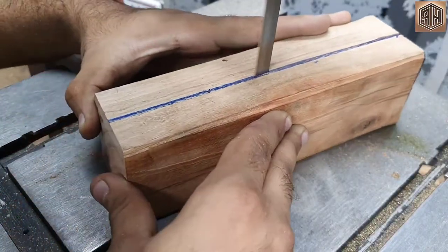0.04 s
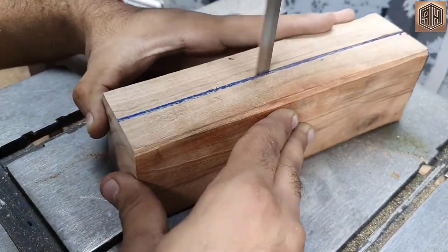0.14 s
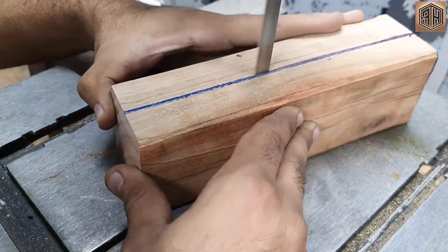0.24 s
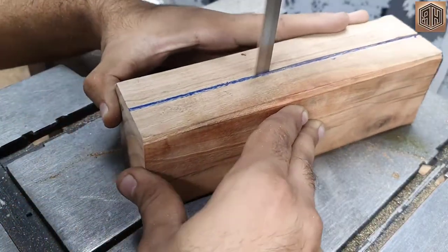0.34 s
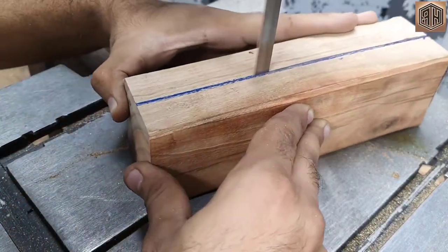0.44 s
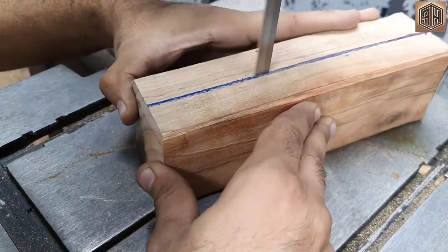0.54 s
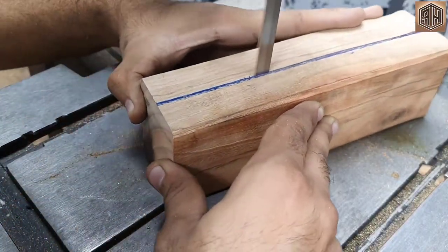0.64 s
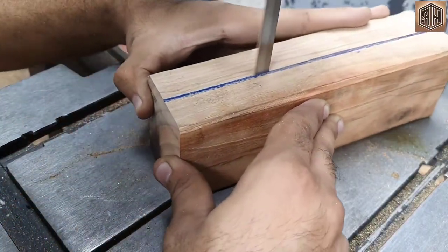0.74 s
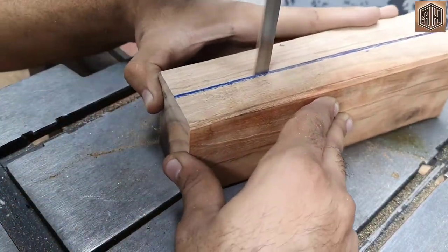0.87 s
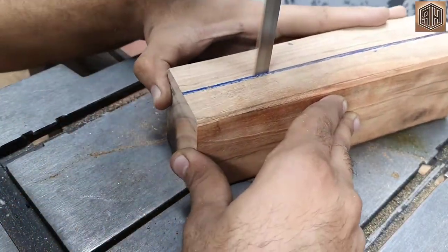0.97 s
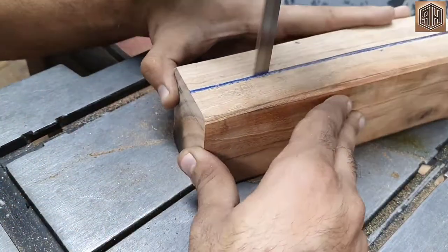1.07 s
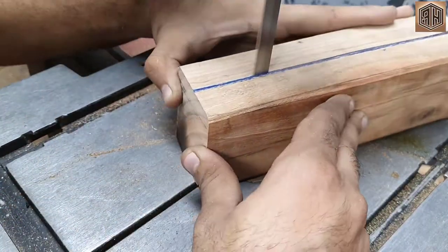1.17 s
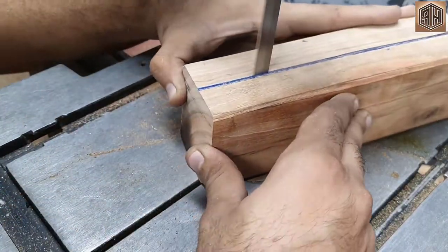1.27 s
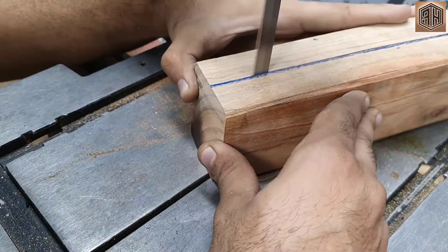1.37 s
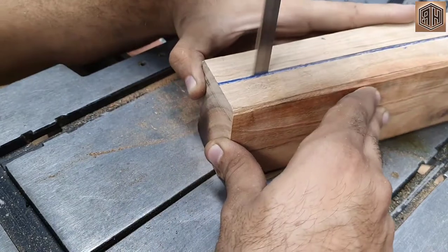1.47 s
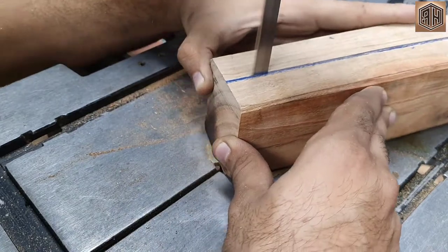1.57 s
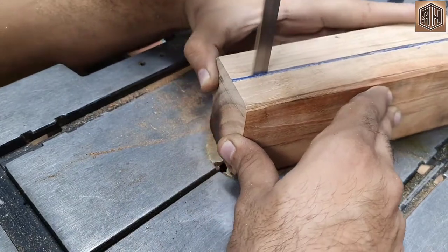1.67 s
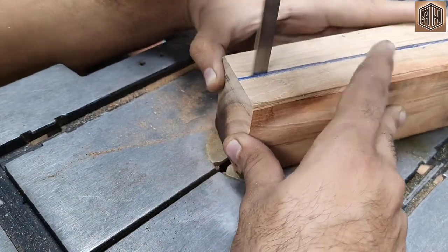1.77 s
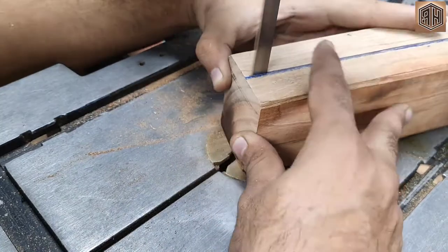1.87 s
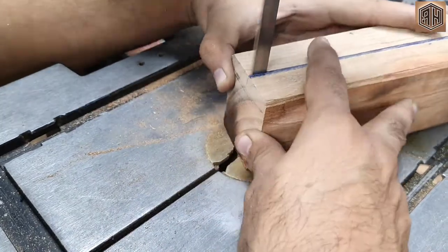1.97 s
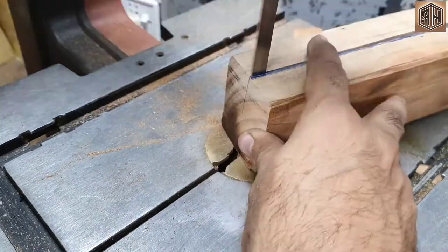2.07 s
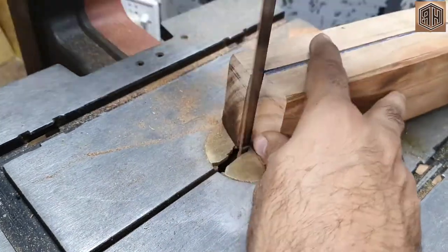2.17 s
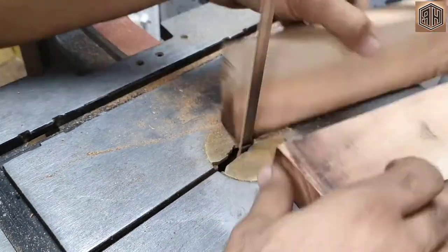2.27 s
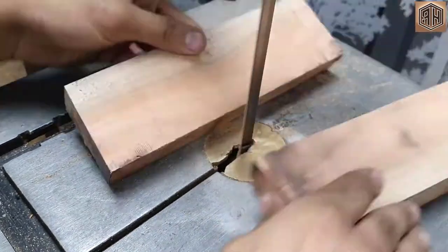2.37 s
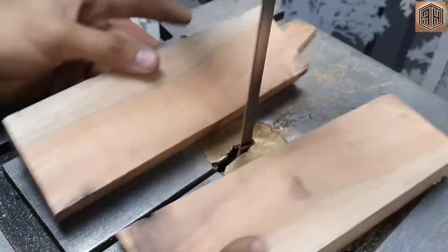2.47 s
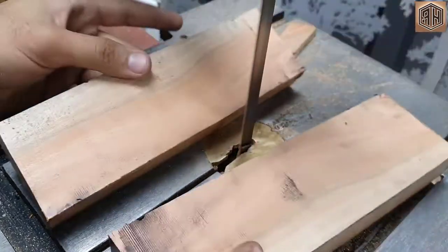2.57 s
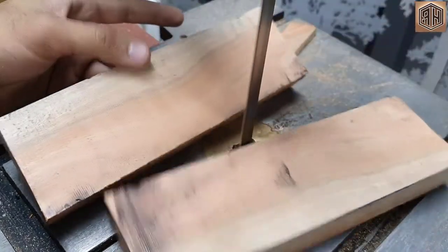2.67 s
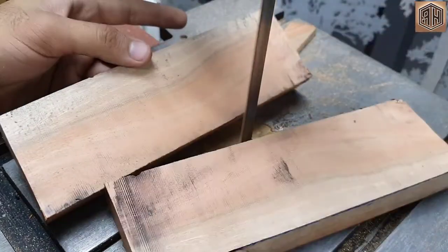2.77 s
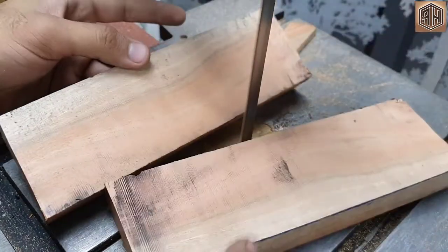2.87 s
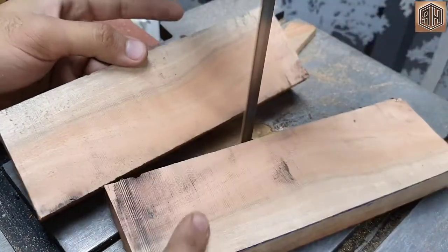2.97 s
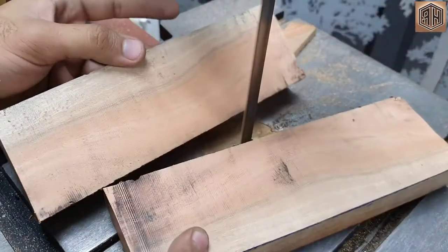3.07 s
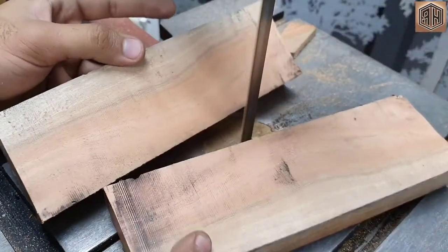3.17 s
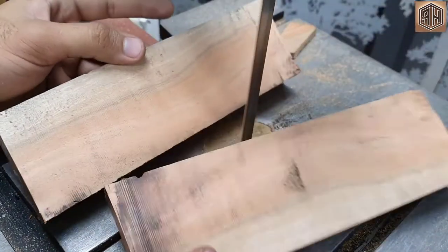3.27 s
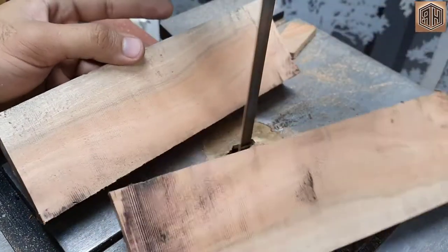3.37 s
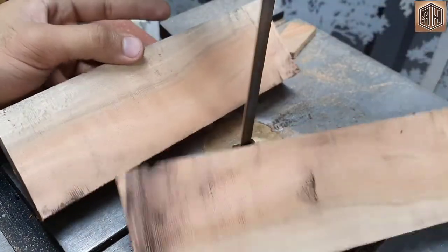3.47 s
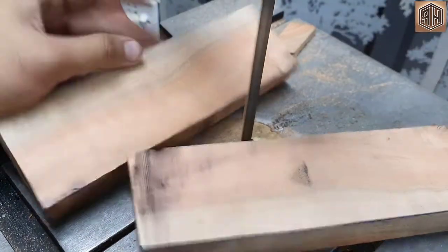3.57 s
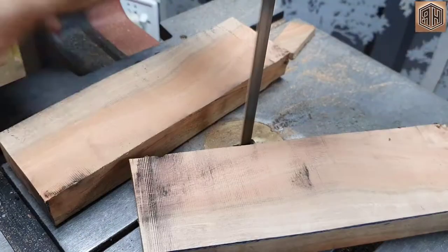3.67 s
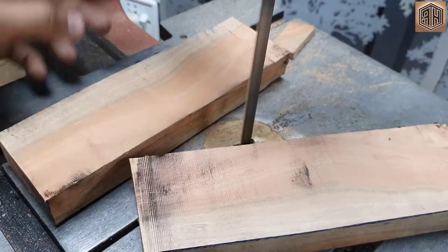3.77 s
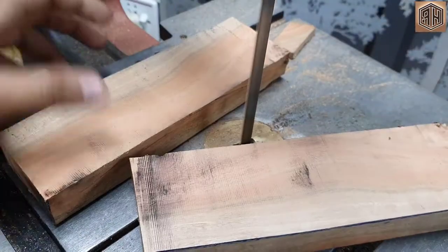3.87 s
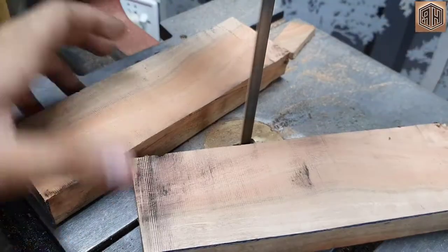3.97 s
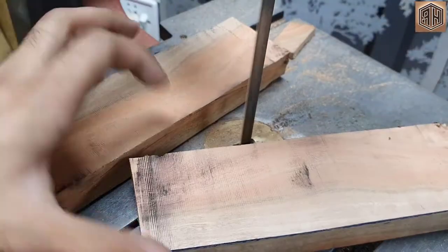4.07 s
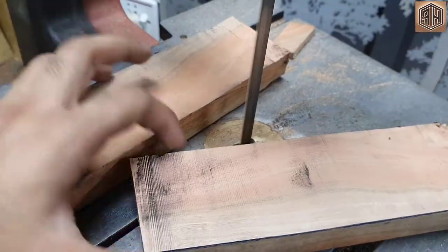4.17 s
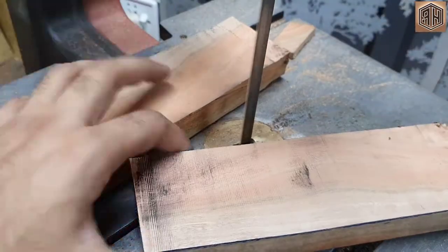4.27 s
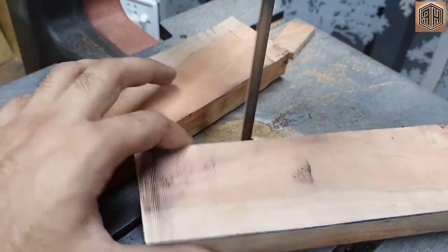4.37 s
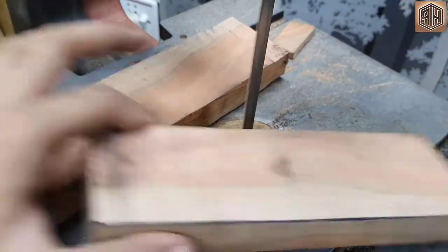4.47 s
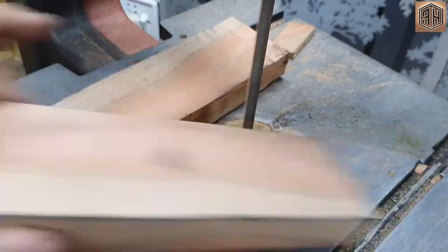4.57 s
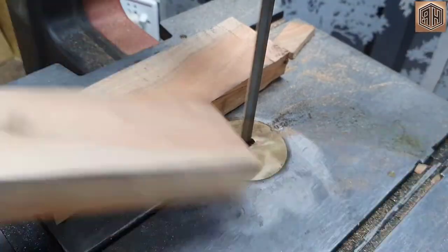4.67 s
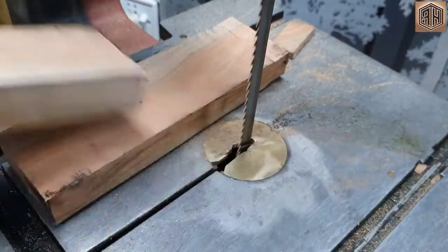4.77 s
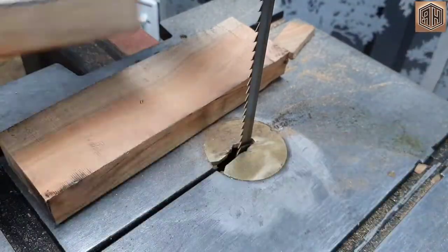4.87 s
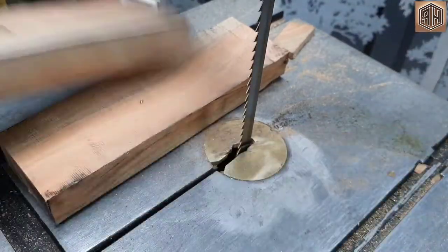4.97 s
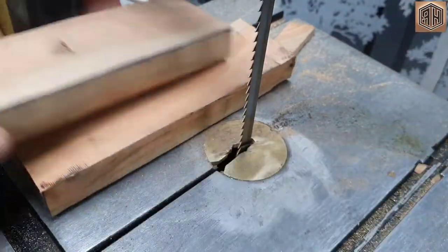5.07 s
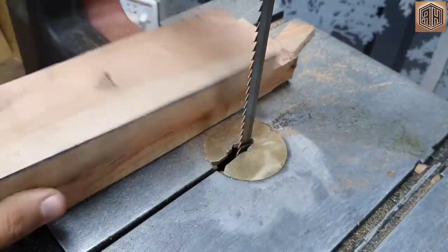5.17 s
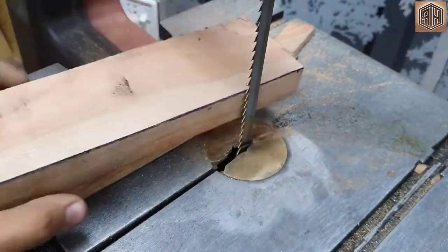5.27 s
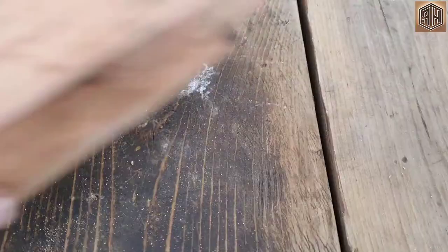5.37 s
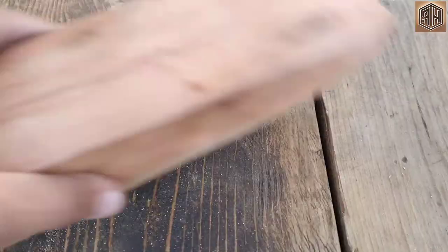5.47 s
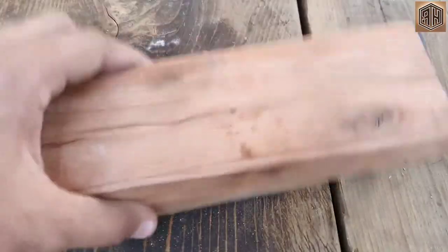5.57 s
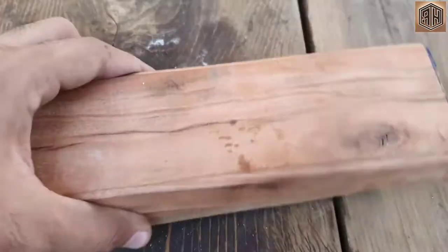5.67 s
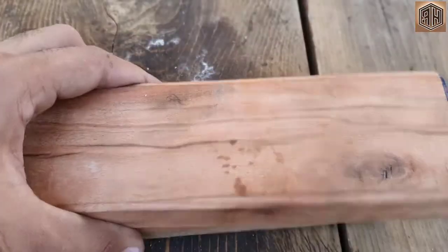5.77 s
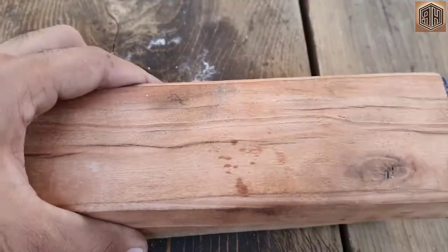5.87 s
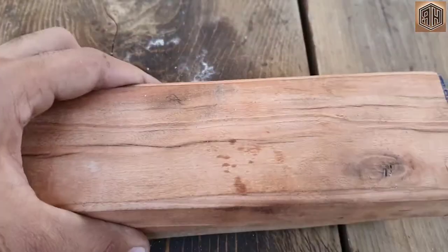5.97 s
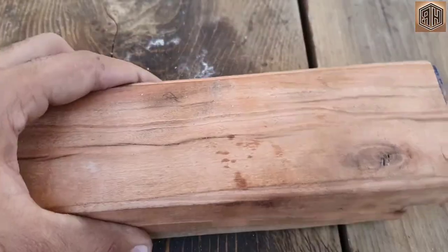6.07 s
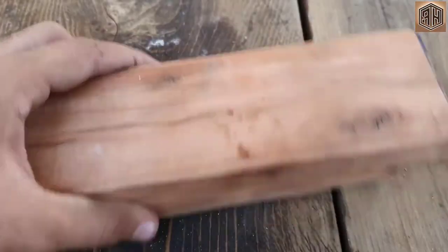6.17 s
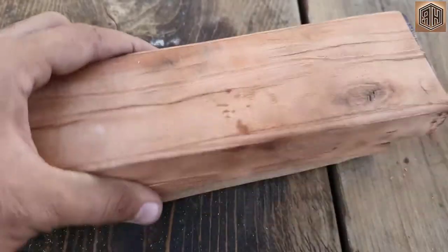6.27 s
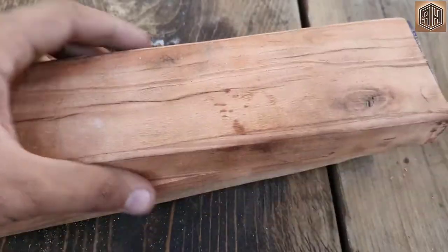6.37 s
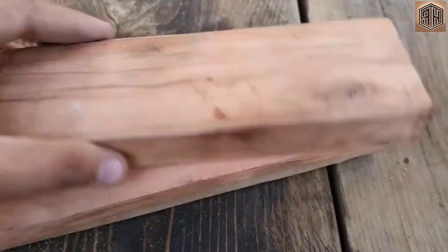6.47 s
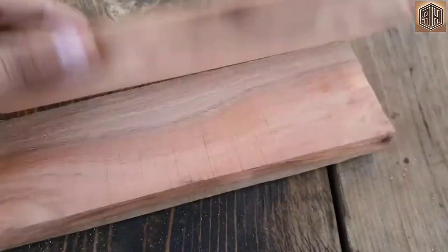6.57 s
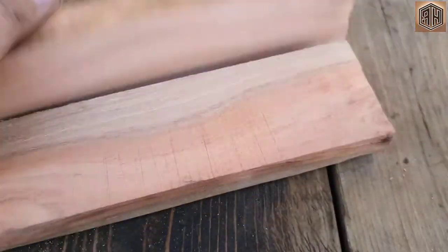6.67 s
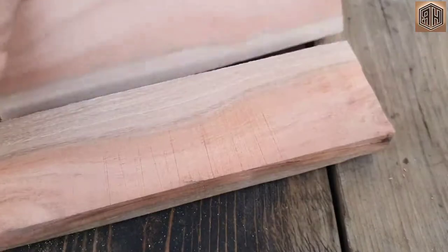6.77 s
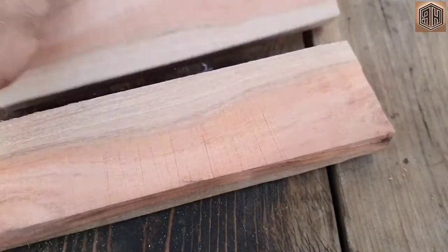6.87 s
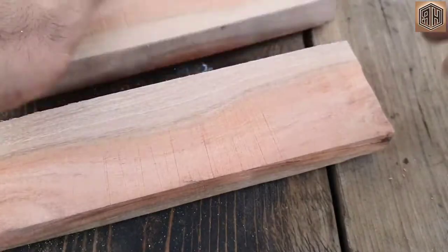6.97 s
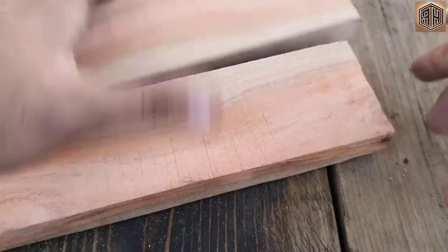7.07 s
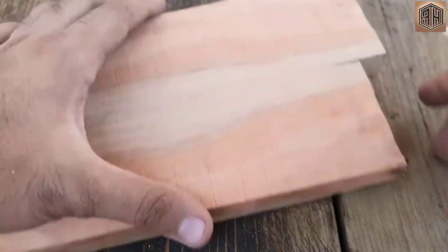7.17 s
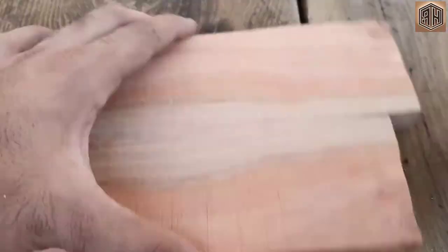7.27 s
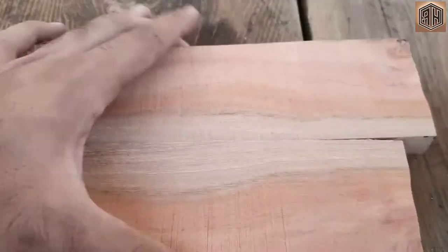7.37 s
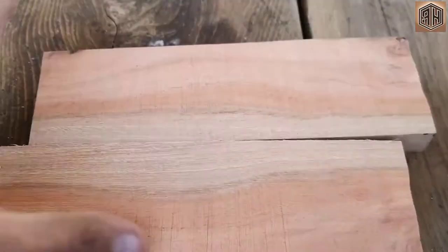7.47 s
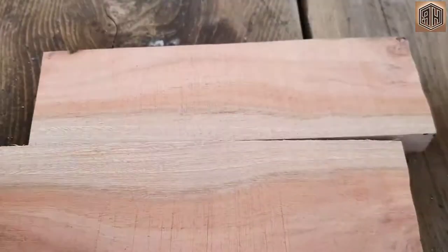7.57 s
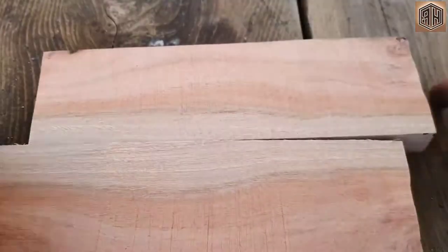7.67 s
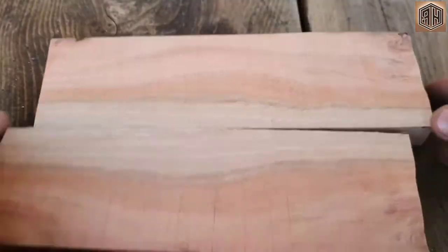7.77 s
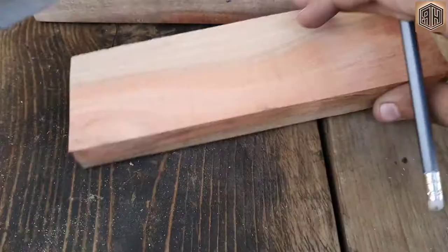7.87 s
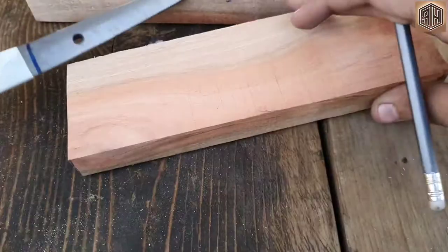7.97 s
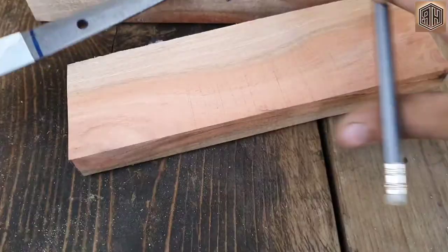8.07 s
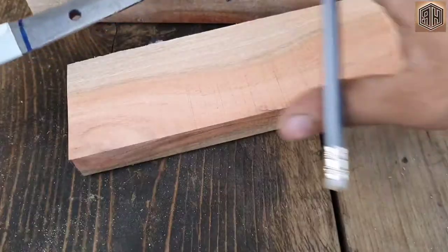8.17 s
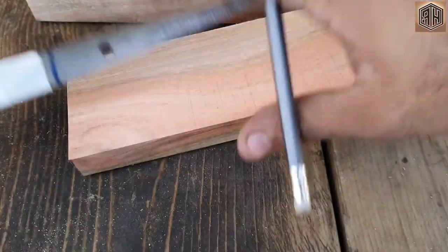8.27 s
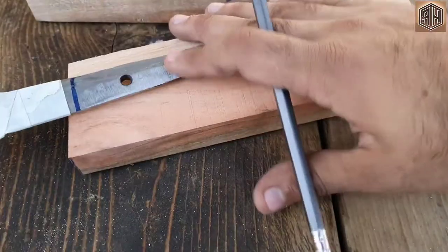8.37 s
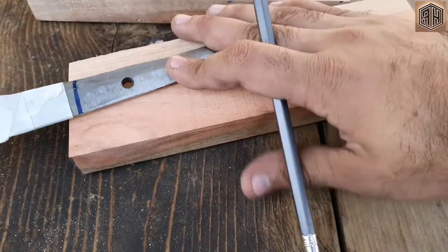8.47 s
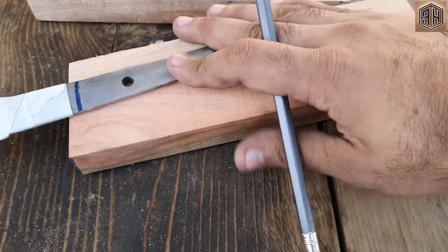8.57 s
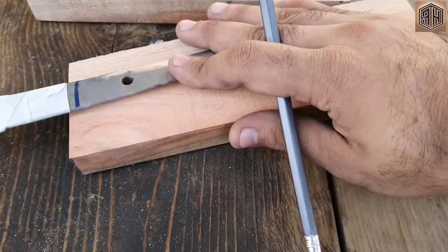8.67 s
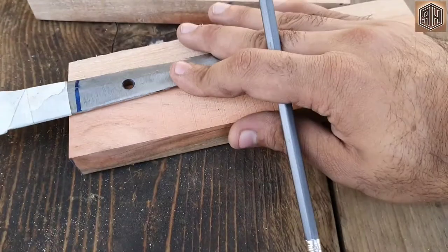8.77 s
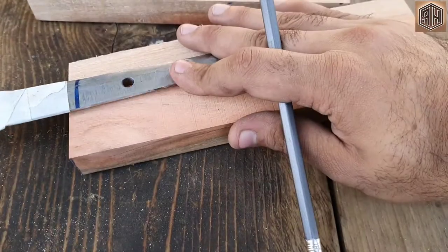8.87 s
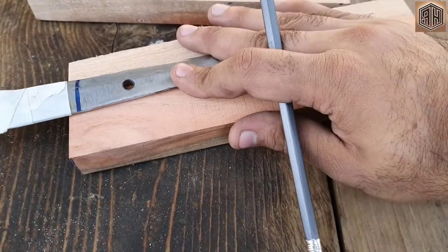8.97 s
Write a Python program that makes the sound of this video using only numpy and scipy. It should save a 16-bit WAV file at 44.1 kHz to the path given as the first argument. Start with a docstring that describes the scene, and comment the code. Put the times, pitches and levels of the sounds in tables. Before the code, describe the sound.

A bandsaw rasps loudly through a wooden block, squeals and snaps free, coasts down rumbling, then wood knocks on steel and bench and metal clinks.

```python
"""A bandsaw rasps through a wooden block: tooth-shaped noise bursts ring the blade over a droning frame.
The blade squeals, breaks through with a snap of fibres, then rumbles and rubs as it coasts to rest.
The two halves knock on the steel saw table, then on a plank bench: short impacts, clatter and ringing modes.
They slide about as grainy noise, a steel rule clinks down on one of them, and a small workshop answers."""
import sys
import numpy as np
from scipy import signal
from scipy.fft import rfft, irfft, next_fast_len
from scipy.io import wavfile
from scipy.ndimage import uniform_filter1d

SR = 44100
rng = np.random.default_rng(int(sys.argv[2]) if len(sys.argv) > 2 else 0)


def int16_out(signal):
    """Quantize to a 16-bit WAV file."""
    q = np.round(np.clip(np.atleast_2d(signal).T, -1, 1) * 32767)
    wavfile.write(sys.argv[1], SR, q.astype(np.int16))


N = 398223

# fine hiss of the cut as the block is fed: level_db, drift_db_per_s, drop_at_s, drop_db
HISS_LAW = (-28.1, 1.6, 2.31, 17)
# stereo width of the cut: frequency_hz, side_minus_mid_db
CUT_WIDTH = [(100, -15), (400, -38.5), (2400, -22.5), (4400, -2.5), (15000, -2.5)]
# stereo width of everything else that is spread: frequency_hz, side_minus_mid_db
WIDTH = [(100, -21), (500, -7), (8000, 2.5)]
# the sound drops out for an instant: start_s, end_s
DROPOUT_S = (5.398, 5.421)
CUT_END_S = 2.482
EDGE_RISE_S = .0008  # onset of ringing wood and hard edges


def amp(db):
    """Decibels to gain."""
    return np.exp(np.log(10) / 20 * np.asarray(db))


def unit(x):
    """x at rms 1."""
    return x / np.sqrt(np.mean(x ** 2) + 1e-20)


def along(points, hz):
    """Read (frequency_hz, value) points on a log frequency axis."""
    f, v = np.transpose(points)
    return np.interp(np.log(hz + 1), np.log(f + 1), v)


def curves(rows):
    """One value per sample for each column after the time."""
    s, *cols = np.transpose(rows)
    return [np.interp(np.arange(N) / SR, s, c) for c in cols]


def wobble(rate, size=N):
    """A smooth random curve, rate knots a second."""
    knots = signal.resample_poly(rng.standard_normal(int(size * rate / SR) + 4), up=4, down=1)
    return np.interp(np.arange(size) * 4 * rate / SR, np.arange(len(knots)), knots)


def phase(hz):
    """Running phase of a changing frequency."""
    return 2 * np.pi * np.cumsum(hz) / SR


def between(start, end):
    """1 from start to end, with short fades."""
    t = np.arange(N) / SR
    return uniform_filter1d(1. * ((t >= start) & (t <= end)), size=400)


def swells(rows):
    """Gain of (centre_s, half_length_s, level_db) strokes that each rise and fall smoothly."""
    t = np.arange(N) / SR
    power = 0
    for s, half, db in rows:
        stroke = np.exp(-np.minimum(((t - s) / half) ** 2, 20))
        power = power + (amp(db) * stroke) ** 2
    return np.sqrt(power)


def noise():
    """Two unrelated white noises: mid and side."""
    return rng.standard_normal((2, N))


def filtered(x, response):
    """x times a response of frequency."""
    n = x.shape[-1]
    m = next_fast_len(n + 8192, True)
    return irfft(rfft(x, m) * response(np.fft.rfftfreq(m, 1 / SR)), m)[..., :n]


def coloured(x, spectrum):
    """x shaped by a (frequency_hz, db_per_hz) spectrum, at rms 1."""
    return unit(filtered(x, lambda hz: amp(along(spectrum, hz))))


def resonance(x, hz, width_hz):
    """x through one resonance."""
    return signal.lfilter(*signal.iirpeak(hz, hz / width_hz, fs=SR), x)


def resonate(x, modes):
    """x through (pitch_hz, width_hz, level_db) resonances that swell and fade on their own, at rms 1."""
    return unit(sum(amp(db + 3 * wobble(10)) * resonance(x, hz, width) for hz, width, db in modes))


def spread(pair, width):
    """Mid and side to left and right."""
    side = filtered(pair[1], lambda hz: amp(along(width, hz)))
    return np.array([pair[0] + side, pair[0] - side])


def dying(decay):
    """Two half-second noises whose every frequency dies at its own speed, from (frequency_hz, t60_s)."""
    hz, t, z = signal.stft(rng.standard_normal((2, SR // 2)), SR, nperseg=128)
    fade = amp(-60 * t / along(decay, hz)[:, None])
    return signal.istft(z * fade, SR, nperseg=128)[1][:, :SR // 2]


def ring(modes, tilt_db=0, length=1, rise=0.0023, blur_hz=0):
    """Half a second of struck modes, at new strengths for each blow and blurred by a buzzing contact; peak 1."""
    t = np.arange(SR // 2) / SR
    x = np.zeros(len(t))
    for hz, db, t60 in modes:
        level_db = db + tilt_db * np.log2(hz) + 0.73 * rng.normal()
        decay = amp(level_db - 60 * t / (t60 * length))
        x += rng.choice([-1, 1]) * decay * np.sin(phase(hz + blur_hz * wobble(500, size=len(t))))
    x = x * (1 - np.exp(-(t / rise) ** 2))
    return x / np.abs(x).max()


def add(track, s, sound):
    """Mix a sound into a track at time s."""
    part = track[..., round(s * SR):][..., :sound.shape[-1]]
    part += sound[..., :part.shape[-1]]


def flutter(hz, blur_hz, rate, partials=(1,)):
    """An unsteady friction tone with the given partials, as mid and side at rms 1."""
    turns = np.array([phase(hz + blur_hz * wobble(rate)) for _ in range(2)])
    # the contact grips and lets go, so each partial flutters on its own
    return unit(sum(amp(4 * wobble(rate / 2)) * np.sin(k * turns) / k for k in partials))


def waver(rows, blur_hz, rate, partials=(1,)):
    """A friction tone along (time_s, pitch_hz, level_db) rows."""
    hz, db = curves(rows)
    return amp(db) * between(rows[0][0], rows[-1][0]) * flutter(hz, blur_hz, rate, partials)


def grain():
    """Uneven gain of wood that sticks and slips: 4 dB deep, 140 knots a second."""
    return unit(amp(4 * wobble(140)))


def fed(law):
    """Level in dB of one layer of the cut: a slow drift, the easing push, the drop as teeth leave the wood."""
    exit_s = 0.02  # time scale of the drop
    ease_from_s, ease_db_per_s = 2.018, 12.5  # the hands push more gently near the end
    db, drift_db, drop_s, drop_db = law
    t = np.arange(N) / SR
    gone = (1 + np.tanh((t - drop_s) / (2 * exit_s))) / 2
    eased_db = ease_db_per_s * np.maximum(t - ease_from_s, 0)
    return db + drift_db * t - eased_db - drop_db * gone


def blade_ring(strokes):
    """The toothed band rings in modes, each bitten hardest at some point of the feed, and flexes in the kerf."""
    # blade modes: pitch_hz, width_hz, level_db, strongest_at_s
    blade_modes = [(1919, 34, -1.5, 0.3), (2209, 18, -5.5, 1.6), (2756, 47, 3.5, 1.4),
                   (3057, 35, 5.5, 0.73), (3620, 23, 2.5, 1.8), (3890, 38, 1, 0.24), (3935, 34, 2.5, 5.4),
                   (4064, 11, 5.5, 0.8), (4303, 64, -2.5, 0.43), (4460, 30, 5.5, 0.58),
                   (4700, 130, -5, 1.6), (5560, 22, 1.5, 2.1), (6590, 280, -7, 0.34)]
    flex_share, flex_db, flex_per_s = .003, 1.4, 24  # pitch wander, swell of each mode, knots a second
    t = np.arange(N) / SR
    blade = np.zeros((2, N))
    for hz, width, db, s in blade_modes:
        bitten_db = 4.3 * np.exp(-((t - s) / .5) ** 2)
        blade += amp(db + bitten_db + flex_db * wobble(flex_per_s)) * resonance(strokes, hz, width)
    flexing = np.cumsum(1 + flex_share * wobble(flex_per_s))
    bent = np.array([np.interp(flexing, np.arange(N), side) for side in blade])
    return bent / np.std(blade[:, t < CUT_END_S])


def frame_hum(teeth_hz):
    """The saw frame drones in pitches that sink with the blade speed and as the cut deepens."""
    # hum at the start of the cut: pitch_hz, level_db
    frame_modes = [(333, -15.5), (398, -13.5), (448, -8.5), (522, -13.5), (554, -13), (773, -12)]
    sag_per_s = 0.018  # share of the pitch lost as the cut deepens
    sag = teeth_hz / teeth_hz[0] * (1 - sag_per_s * np.arange(N) / SR)
    hum = np.zeros(N)
    for hz, db in frame_modes:
        turn = phase(hz * sag * (1 + .008 * wobble(50)))
        hum += amp(db + 2.5 * wobble(50)) * np.sqrt(2) * np.sin(turn)
    return hum


def cut():
    """Each tooth tears out a burst of chips that rings the blade, over wood noise and a droning frame."""
    # blade speed: time_s, teeth_per_s
    teeth = [(0, 727), (2.18, 726.5), (2.28, 700), (2.48, 540)]
    # steady tones of the teeth: multiple_of_tooth_rate, level_db
    tooth_tones = [(1, -9.5), (3, -12)]
    # spectra of the rasp, the hiss and the wood: frequency_hz, db_per_hz
    rasp_colour = [(1100, -38), (1650, -25), (1900, -2.5), (4000, -3.5), (5200, -0.5), (7700, -2.5),
                   (9000, -11.5), (11700, -38)]
    hiss_colour = [(4400, -40.5), (7500, -14.5), (9200, -1), (11100, 1.5), (13600, 5.5), (15000, 0)]
    wood_colour = [(200, -34.5), (340, -3), (560, -2.5), (850, -5), (1550, -4.5), (4000, -37)]
    # layers of the cut as it is fed: level_db, drift_db_per_s, drop_at_s, drop_db
    rasp_law = (-22.5, -0.2, 2.39, 7)
    wood_law = (-43, -3.5, 2.32, 16)
    frame_law = (-37, 0, 2.32, 36)
    # flares where the teeth bite deep: centre_s, half_length_s, level_db, pitch_hz
    deep_bites = [(0.46, 0.06, -35, 4400), (0.8, 0.16, -31, 4150), (1.02, 0.1, -31, 7600)]
    bite_width = 0.21  # width of a flare over its pitch
    # the thin end of the block resounds: centre_s, half_length_s, level_db
    end_grain = [(2.25, 0.059, -31)]
    relief_s, relief_db = 2.3, -20.5  # the hum weakens when the push lets up

    teeth_hz = curves(teeth)[0]
    tooth = phase(teeth_hz * (1 + 0.0017 * wobble(25)))
    # uneven teeth bite unequally
    bite = amp(0.39 * np.cos(tooth) + 1.6 * np.cos(0.28 * tooth) + 0.72 * wobble(300))
    # the long steel band adds a dense fine ring to every burst
    band = dying([(1000, 0.087), (15000, 0.083)])
    band_ring = unit(signal.fftconvolve(bite * noise(), band, axes=1)[:, :N])
    chips = bite * noise() + 1.1 * band_ring
    blade = blade_ring(bite * noise())
    frame = frame_hum(teeth_hz)
    tones = sum(amp(db + 3.5 * wobble(11.82)) * np.sqrt(2) * np.sin(k * tooth) for k, db in tooth_tones)

    rasp = amp(-3.5) * coloured(chips, rasp_colour) + amp(-2.0) * blade
    pair = amp(fed(rasp_law) + 0.64 * wobble(22)) * rasp
    pair += amp(fed(HISS_LAW)) * coloured(chips, hiss_colour)
    for s, half, db, hz in deep_bites:
        narrow = resonance(chips, hz, bite_width * hz)
        pair += swells([(s, half, db)]) * unit(resonance(narrow, hz, 2 * bite_width * hz))
    pair += amp(fed(wood_law)) * coloured(noise(), wood_colour)
    pair += swells(end_grain) * coloured(noise(), [(250, -33.0), (1500, -4.0), (6000, -21)])
    relief = amp(relief_db * between(relief_s, CUT_END_S))
    pair += amp(fed(frame_law)) * (relief * frame + tones)
    return spread(pair * between(-1, CUT_END_S), CUT_WIDTH)


def squeal():
    """The blade squeals by friction in the kerf, louder whenever it catches, and whistles as it slows."""
    # squeal in the kerf: time_s, pitch_hz
    squeal_pitch = [(1.1, 13900), (1.95, 13530), (2.22, 14350)]
    # the squeal catches: centre_s, half_length_s, level_db
    catches = [(1.83, 0.2493, -29), (1.945, 0.025, -20.5), (2.2, 0.05, -39)]
    # thin whistle of the slowing blade: time_s, pitch_hz, level_db
    whistle = [(2.31, 8410, -33.5), (2.47, 6240, -43)]
    # a faint squeal at -38 dB joins the catches until the hiss drops
    gain = amp(-38) * between(-1, HISS_LAW[2]) + swells(catches)
    tone = flutter(curves(squeal_pitch)[0], blur_hz=170, rate=900)
    return spread(gain * tone + waver(whistle, blur_hz=200, rate=800), CUT_WIDTH)


def breakthrough():
    """The thinning wood rings as the blade comes out, then the last fibres snap as short noise cracks."""
    # ring of the last thin bridge of wood: time_s, pitch_hz, level_db
    flare = [(2.26, 3860, -38), (2.3, 3735, -25.5), (2.37, 3690, -32)]
    # the last fibres snap: start_s, level_db
    snaps = [(2.371, -10.5), (2.379, -22.5)]
    pair, t = waver(flare, blur_hz=260, rate=900), np.arange(SR // 20) / SR
    for s, db in snaps:
        crack = coloured(noise()[:, :len(t)], [(900, -26), (1900, 0)])
        add(pair, s, amp(db - 60 * t / .04) * crack)
    return spread(pair, CUT_WIDTH)


def coast():
    """The free blade slows evenly, rumbling on its wheels and rubbing the guides; the halves are shoved aside."""
    # spectra of the rumble and the rub: frequency_hz, db_per_hz
    rumble_colour = [(80, -27.5), (220, -14), (320, -3), (680, -3), (975, -10.5), (1390, -7.5), (1770, -16),
                     (2300, -20.5), (3900, -64.5)]
    rub_colour = [(1290, -33), (2200, -2.5), (2800, -14.5), (3450, -5.5), (4200, -22.5), (5500, -21),
                  (15000, -35)]
    # the housing rings along: pitch_hz, width_hz, level_db
    housing_modes = [(322, 14, -1), (456, 9, 1), (545, 10, -6), (602, 10, -1), (668, 14, 2), (778, 16, -2)]
    # the halves are shoved over the saw table: centre_s, half_length_s, rumble_db, rub_db
    shoves = np.array([(2.913, 0.24, -41.5, -71), (3.143, 0.048, -40, -52), (3.4, 0.11, -37, -57.5),
                       (3.993, 0.08, -55, -73)])
    coast_from_s, stop_s, rise_db_per_s = 2.6, 5.74, 165.5
    # loudness follows powers of the blade speed
    rumble_db, rumble_power = -33, 4.17
    rub_db, rub_power = -56, 2.9
    sink_power = 0.25  # the rumble's pitch sinks with the speed

    t = np.arange(N) / SR
    speed = np.clip((stop_s - t) / (stop_s - coast_from_s), 0, 1)
    rise = amp(rise_db_per_s * np.minimum(t - coast_from_s, 0))
    # reading the noise ever more slowly lowers it
    travel = np.cumsum(speed ** sink_power)
    roll = np.array([np.interp(travel, np.arange(N), side) for side in coloured(noise(), rumble_colour)])
    housing = amp(2) * resonate(coloured(noise(), rumble_colour), housing_modes)
    rumble = amp(rumble_db) * rise * speed ** rumble_power * unit(roll + housing)
    shoved = unit(coloured(grain() * noise(), rumble_colour) + housing)
    rumble += swells(shoves[:, [0, 1, 2]]) * shoved
    blade_rub = amp(rub_db) * between(CUT_END_S, stop_s) * speed ** rub_power
    rub_gain = np.hypot(blade_rub, swells(shoves[:, [0, 1, 3]]))
    rub = rub_gain * unit(np.sqrt(grain())) * coloured(noise(), rub_colour)
    return spread(amp(wobble(30)) * rumble + rub, WIDTH)


def booms():
    """The saw table swells into a low, unsteady drone when it is leant on or knocked."""
    # centre_s, half_length_s, level_db, pitch_hz
    drones = [(4.785, 0.17, -56, 87.2), (5.204, 0.084, -44, 74.5), (5.355, 0.038, -44, 77.4)]
    pair = np.zeros((2, N))
    for s, half, db, hz in drones:
        pair += swells([(s, half, db)]) * flutter(np.full(N, hz), blur_hz=11, rate=60)
    return spread(pair * between(-1, DROPOUT_S[0]), WIDTH)


def knocks(rows, modes, clatter, decay, ring_db, impact, crack_hz):
    """Each blow is a short impact, a dense clatter and a few modes; the contact sets its thud and crack."""
    # wood gives a little, then pushes back in one short impact ahead of the clatter
    rise_at_0_db_s, impact_t60_s = .0008, .03
    softening = .5  # the lighter the touch, the slower its rise (power of the level)
    pair, t = np.zeros((2, N)), np.arange(SR // 2) / SR
    splits = [(450, 'low'), ((450, crack_hz), 'band'), (crack_hz, 'high')]
    bands = [signal.butter(4, edges, kind, fs=SR, output='sos') for edges, kind in splits]

    def head(x):
        """Rms of the first 20 ms."""
        return np.sqrt(np.mean(x[..., :SR // 50] ** 2))

    for s, db, thud_db, crack_db in rows:
        rise_s = rise_at_0_db_s * amp(-softening * db)
        contact = (1 - np.exp(-t / rise_s)) * (1 + impact * amp(-60 * t / impact_t60_s))
        burst = coloured(dying(decay) * contact, clatter)
        tone = ring(modes, rise=EDGE_RISE_S) * [[1], [rng.uniform(-.5, .5)]]
        blow = burst / head(burst) + amp(ring_db) * tone / head(tone[0])
        for band, level_db in zip(bands, [thud_db, 0, crack_db]):
            part = signal.sosfilt(band, blow)
            add(pair, s, amp(db + level_db) * part / head(part[0]))
    return spread(pair, WIDTH)


def table_knocks():
    """Wood strikes the steel saw table, whose plate clatters and rings."""
    # start_s, level_db, thud_db, crack_db
    blows = [(3.661, -19, -12.5, -5), (3.712, -19.5, -12, -4), (3.745, -22.5, -10, -12.5),
             (5.118, -28, -2, -23.5), (5.284, -38.5, -8, -29)]
    # pitch_hz, level_db, t60_s
    modes = [(330, -6, .13), (474, -6, .16), (1116, -2, .15), (1334, -6, .14), (1430, -2, .13),
             (1545, -6, .19), (2330, -7, .1)]
    # frequency_hz, db_per_hz
    clatter = [(70, -23), (300, -7), (725, -7), (1390, -0.5), (1900, -11.5), (2330, -10), (3800, -28.5),
               (5200, -34), (14000, -67.5)]
    # frequency_hz, t60_s
    decay = [(1000, 0.235), (9000, .12)]
    return knocks(blows, modes, clatter, decay, ring_db=-3, impact=5, crack_hz=1760)


def bench_knocks():
    """Wood strikes the plank bench, whose boards thud and ring low; the blows at 8.094 and 8.44 s are the steel
    rule landing on the wood."""
    # start_s, level_db, thud_db, crack_db
    blows = [(5.654, -22.5, -6, -23), (5.689, -35, 0, -15.5), (6.7505, -23.5, 5.5, -32.5),
             (6.781, -33.5, -14, -15.5), (7.06, -49.5, 4, -40), (7.099, -51, -0.5, -35.5),
             (7.226, -57.5, 3.5, -20.5), (8.094, -43.5, 5.5, -7), (8.44, -49, 12, -2.5),
             (8.664, -56, -0.5, -18.5), (8.718, -62.5, -5.5, -21), (8.876, -55, -10, -19),
             (8.935, -55.5, -5, -16)]
    # pitch_hz, level_db, t60_s
    modes = [(241, -2, 0.14), (336, -4, 0.09), (570, -3.5, 0.14), (695, -8.5, 0.16), (793, 0, 0.13),
             (1113, -3.5, 0.1), (1640, -8.5, 0.12)]
    # frequency_hz, db_per_hz
    clatter = [(50, -36), (237, 3.5), (594, -11), (789, 2), (1300, -16), (3300, -22.5), (6000, -34.5),
               (14000, -55)]
    # frequency_hz, t60_s
    decay = [(150, 0.13), (2500, 0.18), (9000, 0.074)]
    return knocks(blows, modes, clatter, decay, ring_db=-5, impact=6, crack_hz=2500)


def taps():
    """A loose half rings freely when it touches the other, and clacks when it tips over onto its hard edge."""
    # a lifted half taps the other: start_s, peak_db
    touches = [(4.718, -31.5)]
    # the free block: pitch_hz, level_db, t60_s
    block_modes = [(519, -5, 0.13), (625, -6.5, 0.17), (1360, -25, 0.17)]
    # the edge clacks down: start_s, peak_db, ring_length_factor
    clacks = [(5.689, -12.5, 1), (6.781, -17, .3), (7.21, -44, .3), (7.224, -43, .25)]
    # the clacking edge: pitch_hz, level_db, t60_s before the length factor
    clack_modes = [(1220, 0, .07), (1430, -3, .08), (1690, -6, .06), (2050, -7, .08)]
    track = np.zeros(N)
    for s, db in touches:
        add(track, s, amp(db) * ring(block_modes, blur_hz=40))
    for s, db, length in clacks:
        add(track, s, amp(db) * ring(clack_modes, length=length, rise=EDGE_RISE_S, blur_hz=110))
    return track


def edge_rings():
    """The hard edges of the halves add a thin, rough ring of resonant noise when grazed or struck."""
    # start_s, level_db
    grazes = [(3.661, -32), (3.712, -31), (4.665, -64), (4.72, -63), (5.117, -43), (5.689, -39),
              (6.781, -42)]
    # pitch_hz, width_hz, level_db
    edge_modes = [(2880, 110, 3), (4950, 190, -2.5)]
    pair, t = np.zeros((2, N)), np.arange(SR // 4) / SR
    for s, db in grazes:
        rough = np.zeros((2, len(t)))
        for hz, width, level in edge_modes:
            rough += amp(level) * unit(resonance(noise()[:, :len(t)], hz, width))
        rough = unit(sum(resonance(rough, hz, 2 * width) for hz, width, _ in edge_modes))
        add(pair, s, amp(db - 60 * t / .1) * rough)
    return spread(pair, WIDTH)


def rule():
    """The steel strip clinks with a slight buzz, damped by the hand, and thumps the board beneath."""
    # landings, before panning: start_s, peak_db, brightness_db_per_octave, ring_length_factor, thump_db
    landings = [(8.091, -24, 1.5, 1.6, -40), (8.097, -25, 7, 1.1, -42), (8.4373, -13.5, -2, 0.55, -32.5),
                (8.443, -13, -7, 0.35, -21), (8.456, -30, -7, 1.1, -19)]
    # the strip: pitch_hz, level_db, t60_s before the length factor
    rule_modes = [(2705, -1, .075), (2874, -1, .055), (3200, -4, .035), (4850, -10, .035),
                  (5475, -13, .065), (6170, -21, .065), (6935, -19, .05), (9400, -33, .03)]
    steel, board = np.zeros(N), np.zeros(N)
    for s, db, tilt_db, length, thump_db in landings:
        add(steel, s, amp(db) * ring(rule_modes, tilt_db, length, blur_hz=30))
        add(board, s, amp(thump_db) * ring([(240, 0, .07)], rise=.0038))
    # the steel leans left, the board sits in the middle
    return np.array([amp(4.0) * steel + board, amp(-8.0) * steel + board])


def handling():
    """Uneven sliding noise of hands and wood, scuffs and faint squeaks over the still air of the shop."""
    # hands and wood slide on the bench: centre_s, half_length_s, level_db
    slides = [(5.6, 0.1, -57.5), (6.32, 0.093, -63), (6.72, 0.11, -54), (7.41, 0.048, -60),
              (7.9, 0.028, -56.5), (8.04, 0.17, -58), (8.6, 0.59, -66.5)]
    # light scuffs, of a half over the saw table and of the rule over wood: centre_s, half_length_s, level_db
    brushes = [(3.15, 0.043, -64), (3.34, 0.02, -52.5), (4.63, 0.15, -73), (8.0, 0.04, -69)]
    # wood squeaks faintly as it turns: time_s, base_pitch_hz, level_db
    squeaks = [(6.11, 727, -79), (6.38, 766, -80), (6.72, 750, -81)]
    # spectra of the sliding and the air: frequency_hz, db_per_hz
    sliding_colour = [(40, -9), (300, -2), (1500, -26.5), (2400, -25.5), (4000, -42.5), (12000, -45.5)]
    air_colour = [(20, -22.5), (80, -8.5), (200, -12.5), (500, -23.5), (2500, -40), (15000, -58)]
    slide = swells(slides) * amp(0.75 * wobble(37)) * coloured(noise(), sliding_colour)
    brush = swells(brushes) * coloured(noise(), [(1000, -18), (4000, -5.0), (14000, -12)])
    squeak = amp(3 * wobble(14)) * waver(squeaks, blur_hz=9, rate=110, partials=(2, 3, 4))
    air = amp(-69.0) * coloured(noise(), air_colour)
    return spread(slide + brush + squeak + air, WIDTH)


def shop(x):
    """The short answer of the walls: a dying noise tail, 5 ms late."""
    # frequency_hz, t60_s
    wall_decay = [(150, 0.18), (4000, 0.16), (12000, .15)]
    tail = np.pad(dying(wall_decay), ((0, 0), (SR // 200, 0)))
    return signal.fftconvolve(x, tail / np.linalg.norm(tail[0]), axes=1)[:, :N]


def scene():
    """Saw, knocks and handling in the workshop; the sound drops out for an instant before the bench knocks."""
    # the cutting sounds lean slightly left: 0.6 dB up on the left, 0.6 dB down on the right
    cutting = (cut() + squeal() + breakthrough()) * amp(0) * np.array([[1], [1]]) * amp([[.6], [-.6]])
    saw = cutting + coast() + booms()
    hits = table_knocks() + bench_knocks() + taps() + edge_rings() + rule()
    room = amp(-27.5) * shop(hits)
    return (saw + hits + room + handling()) * (1 - between(*DROPOUT_S))


def record(dry):
    """A very steep low-pass leaves nothing above the treble limit."""
    top_hz = 15750
    return filtered(dry, lambda hz: 1 / (1 + (hz / top_hz) ** 200))


dry = scene()
out = record(dry)
int16_out(out)
```